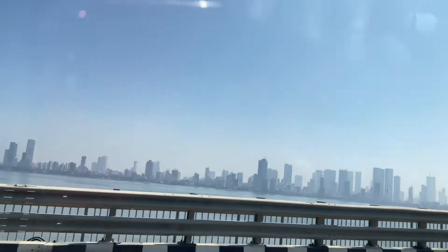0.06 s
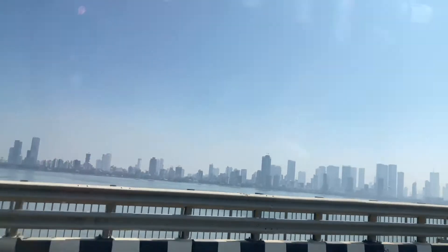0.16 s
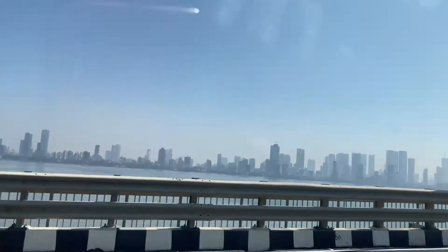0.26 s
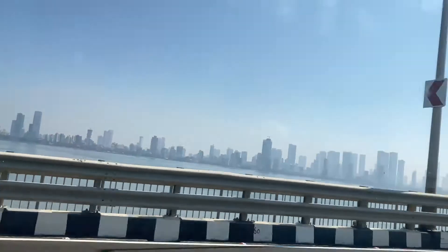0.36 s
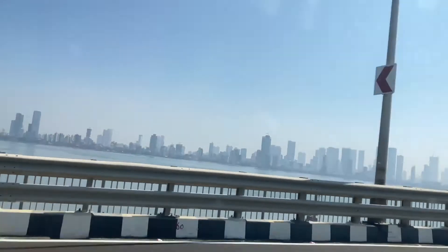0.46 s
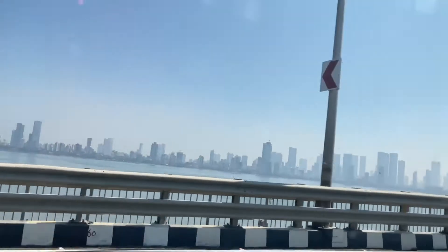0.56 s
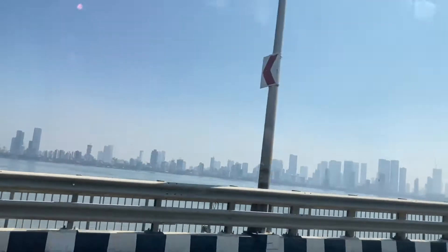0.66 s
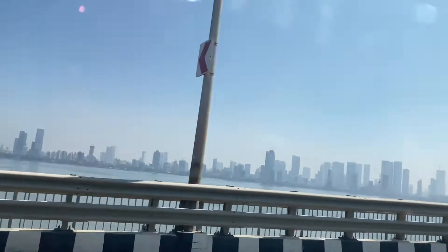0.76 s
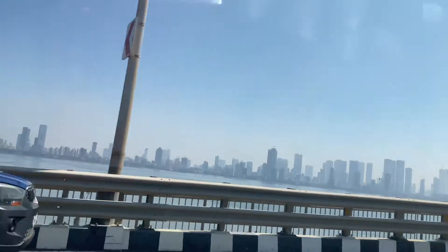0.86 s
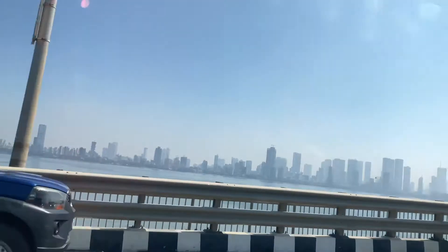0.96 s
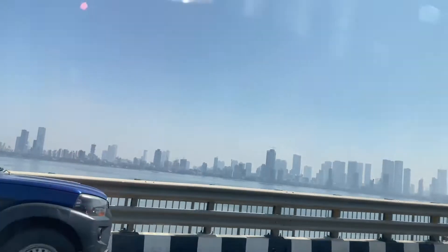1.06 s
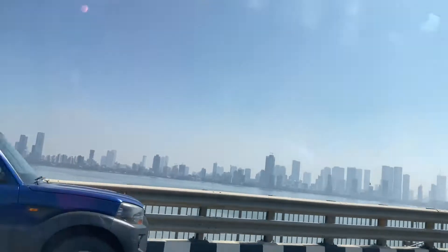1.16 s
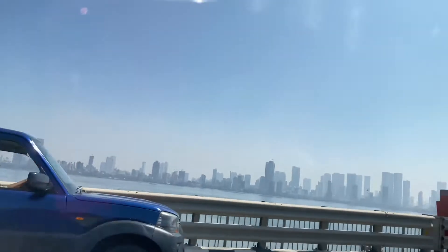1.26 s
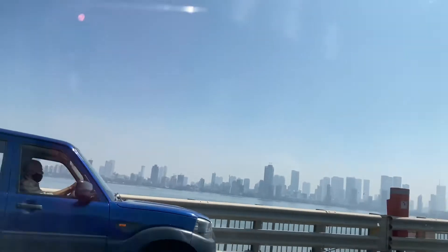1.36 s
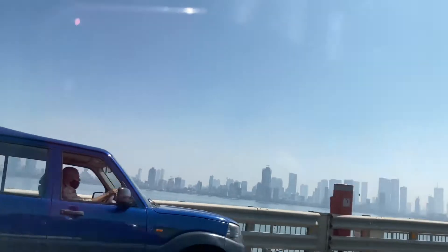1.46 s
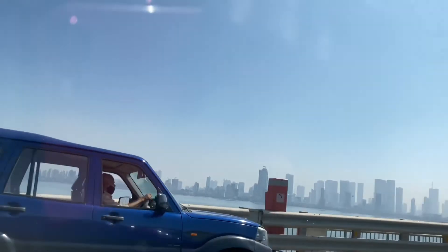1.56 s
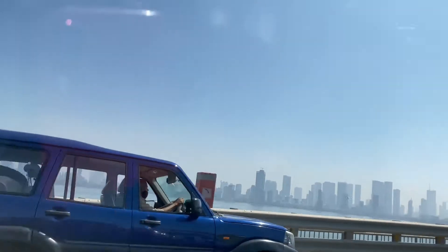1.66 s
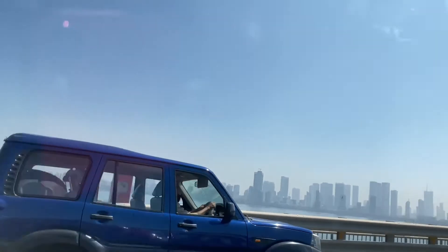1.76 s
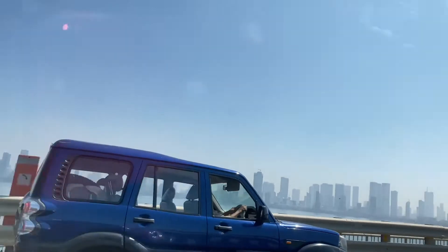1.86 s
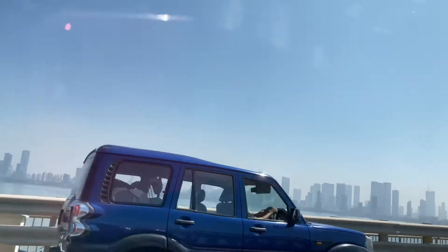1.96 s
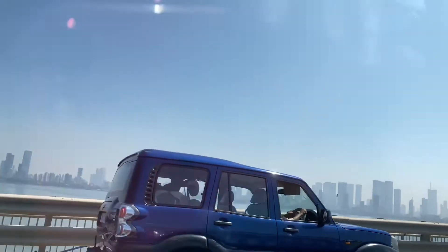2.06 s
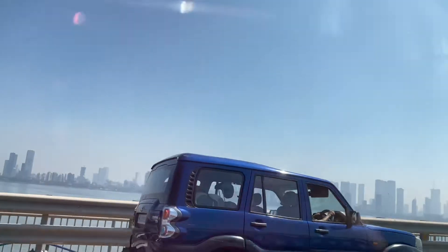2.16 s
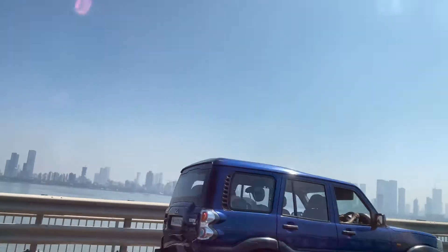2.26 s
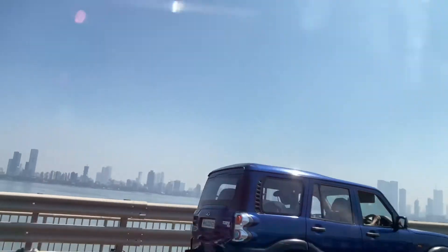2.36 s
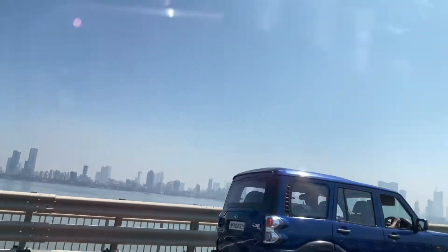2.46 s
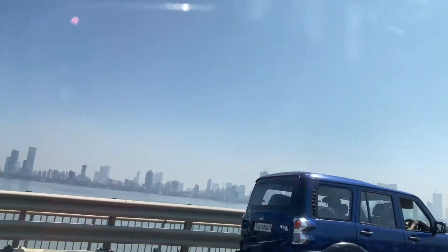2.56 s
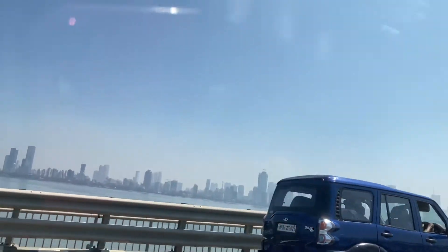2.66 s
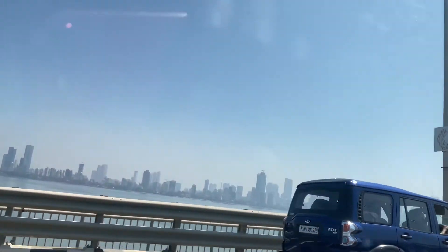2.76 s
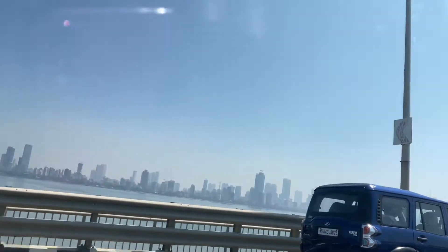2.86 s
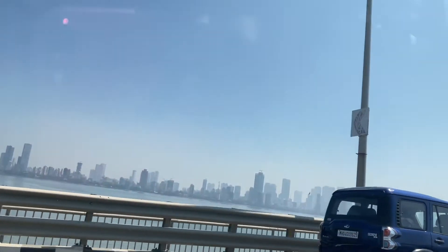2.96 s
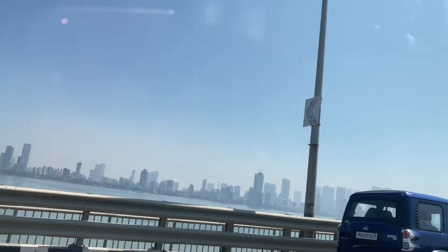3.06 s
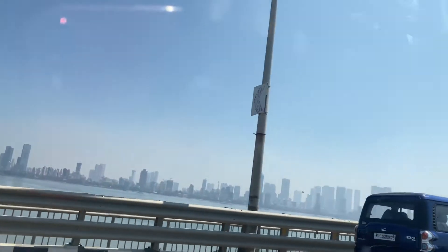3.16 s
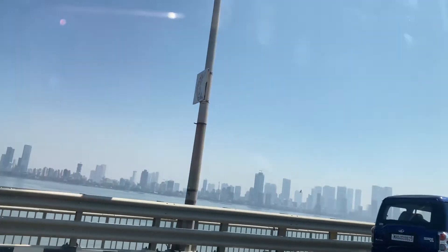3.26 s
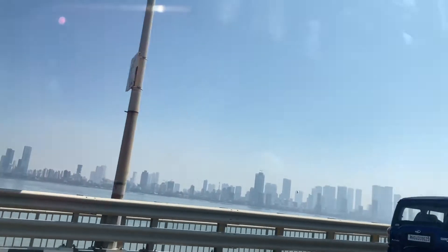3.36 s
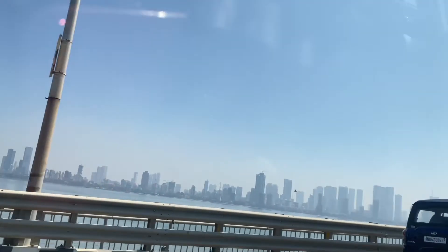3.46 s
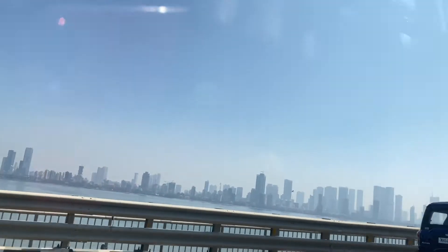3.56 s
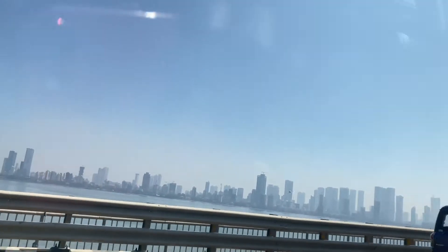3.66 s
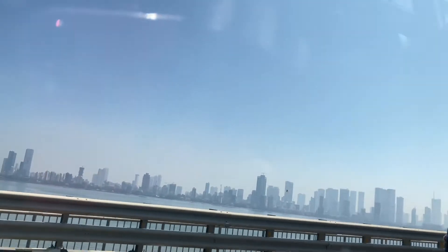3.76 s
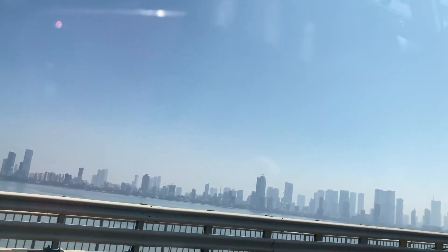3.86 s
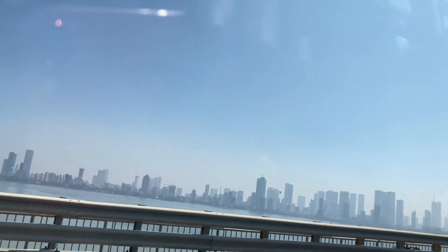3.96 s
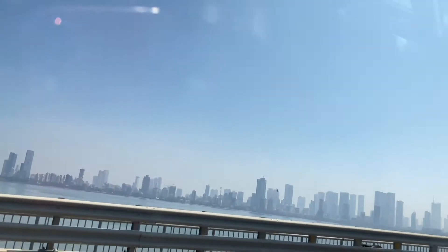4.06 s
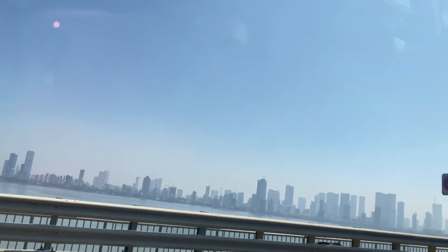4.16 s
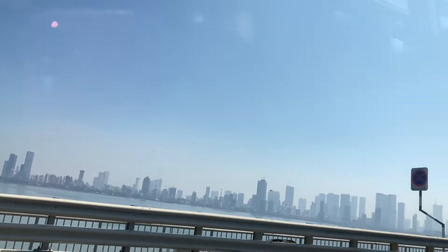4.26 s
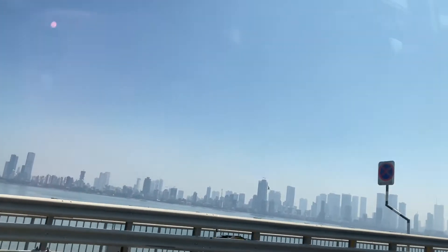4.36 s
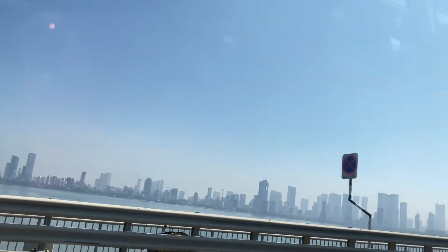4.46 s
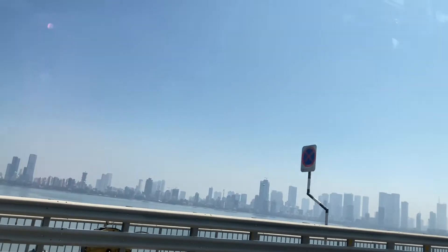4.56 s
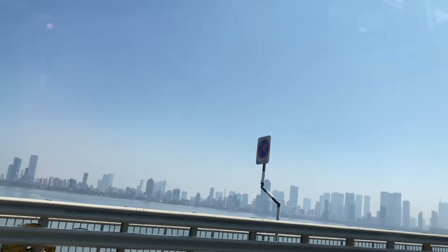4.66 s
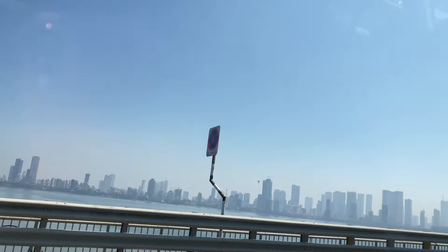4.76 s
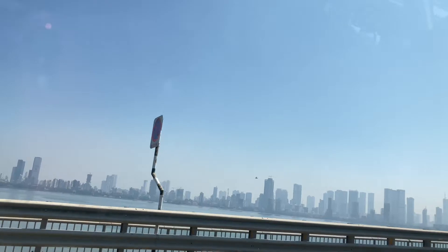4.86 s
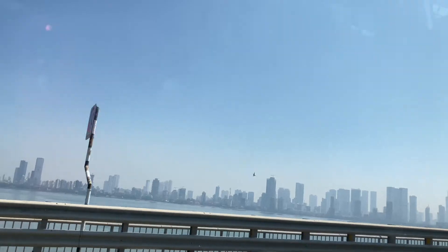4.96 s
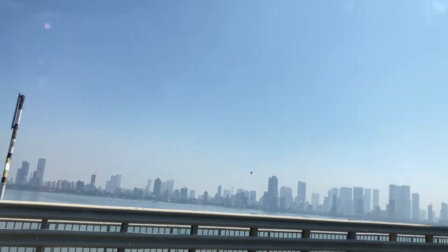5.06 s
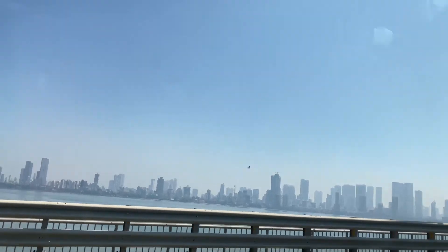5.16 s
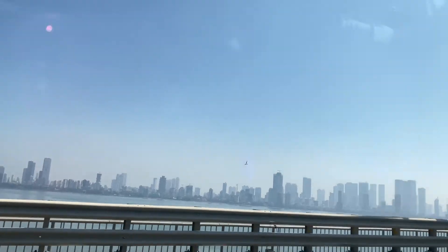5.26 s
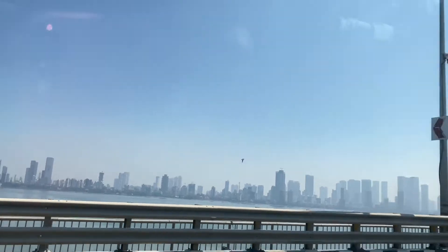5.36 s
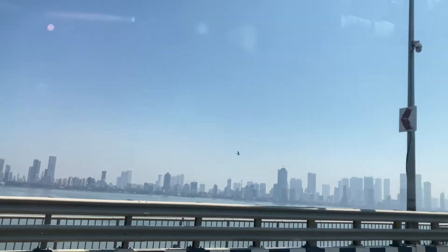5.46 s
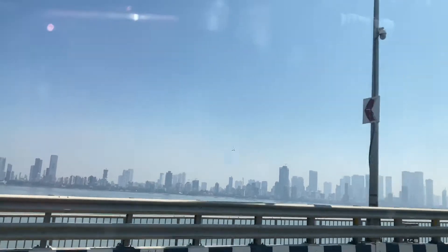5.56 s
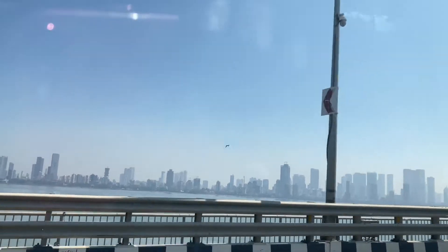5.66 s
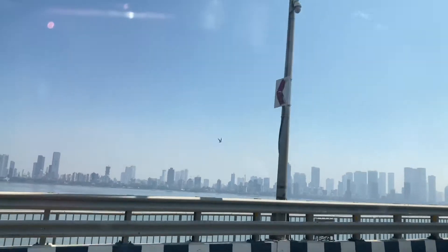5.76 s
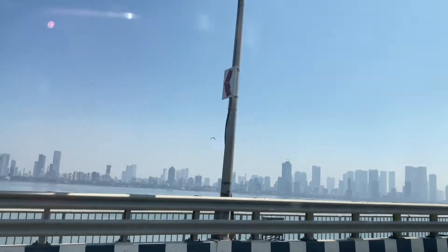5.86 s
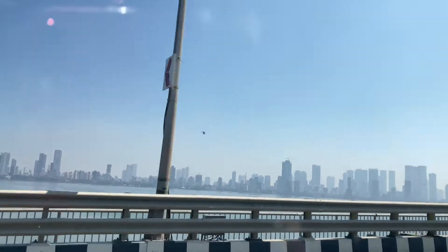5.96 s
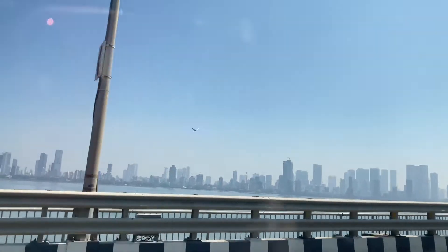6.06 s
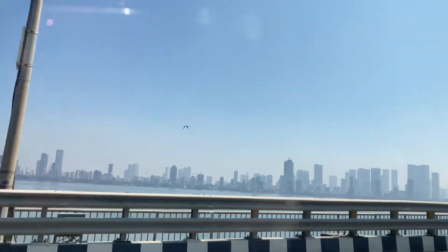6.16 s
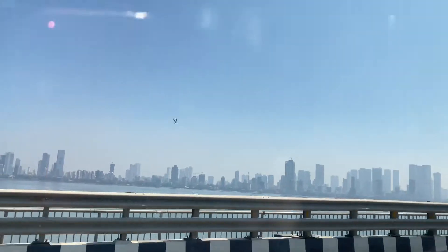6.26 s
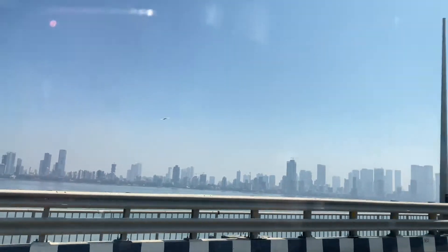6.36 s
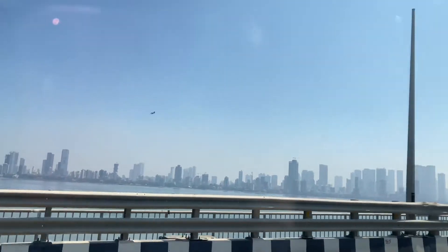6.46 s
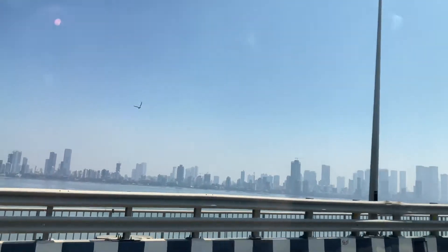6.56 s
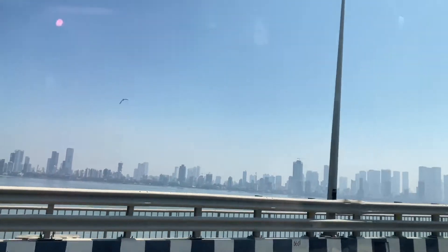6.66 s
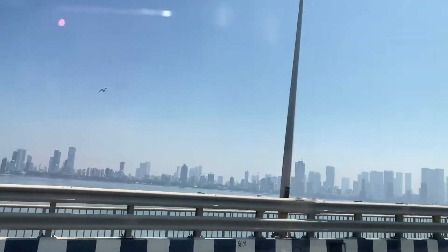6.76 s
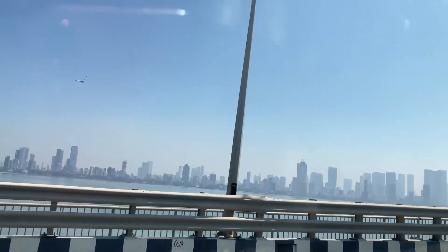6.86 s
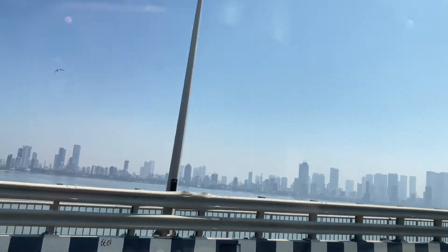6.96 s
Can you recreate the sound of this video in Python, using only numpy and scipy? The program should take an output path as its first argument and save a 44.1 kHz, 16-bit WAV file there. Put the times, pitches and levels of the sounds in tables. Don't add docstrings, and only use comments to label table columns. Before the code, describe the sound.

The listener sits inside a closed car crossing a bridge, with the microphone close in the cabin. From 0 to about 2.5 seconds the tyres hit ribbed strips in a quick regular run, about one every 0.19 seconds. Each is a deep, thick thump with a brief ribbed growl, shaking doors and floor, dull knocks and slaps, and a dry clatter of loose plastic. Rattle and sharp little clacks are strongest from about 0.6 to 2.2 seconds. Low engine hum and heavy road boom swell underneath. Around 2.5 seconds the last strip fades and the level falls sharply. Until 7 seconds there is smooth asphalt: a muffled, wavering low hum, soft tyre roar, faint hollow tyre resonance and barely audible air hiss. Soft floor bumps continue irregularly, slightly fuller around 5 to 5.8 seconds, with tiny ticks near 3.7 and 3.8. The drone continues to the end.

```python
import sys
import numpy as np
from scipy import signal
from scipy.fft import rfft, irfft, next_fast_len
from scipy.io import wavfile

SR = 44100
rng = np.random.default_rng(int(sys.argv[2]) if len(sys.argv) > 2 else 0)


def attenuation_scalar(level_db):
    decades = np.asarray(level_db, float) / 20
    return 10 ** decades


def persist_wave(psi):
    counts = np.round(np.clip(psi, -1, 1) * 32767).astype(np.int16)
    wavfile.write(sys.argv[1], SR, np.atleast_2d(counts).T)


N = 309582
PADDED = next_fast_len(N + 2048)
TIME_S = np.arange(N) / SR

# (time [s], thump level [dB], panel level [dB], rattle level [dB], rattle half width [s])
STRIPS = [(0.065, -11.5, -33, -58, .02), (0.252, -15.5, -32.5, -41, 0.015),
          (0.458, -15.5, -22.5, -43.5, 0.026), (0.631, -13.5, -22.5, -37.5, 0.024),
          (0.823, -13.5, -19, -38.5, 0.034), (1.004, -13, -17, -35, 0.036), (1.193, -12, -19, -37.5, 0.043),
          (1.379, -8.5, -21, -35, 0.038), (1.56, -8, -23.5, -38, 0.032), (1.746, -10, -23.5, -34.5, 0.035),
          (1.937, -11, -21, -36.5, 0.038), (2.124, -10, -19.5, -37.5, 0.047),
          (2.313, -15.5, -35, -44.5, 0.046), (2.49, -23, -28, -48.5, 0.13)]


def strips():
    ribs_per_s, jitter = 85, 0.11
    turns = np.cumsum(ribs_per_s * (1 + jitter * drift(30)) / SR)
    ribs = np.flatnonzero(np.diff(np.floor(turns)))
    chop = 1 + 0.13 * np.cos(2 * np.pi * turns)
    return thumps(ribs) + panels(chop) + rattle(chop)


def thumps(ribs):
    # (pitch [Hz], level [dB], time to fall 60 dB [s])
    body_modes = [(53, -6, 0.13), (93.6, -9, 0.043), (108, -3.5, 0.08), (125.1, 1.5, 0.23),
                  (149, -18, 0.078), (213, -19, 0.025)]
    rib_spread_db, ribs_db, half_s = 4, -6.5, 0.058
    s, thump_db = np.transpose(STRIPS)[:2]
    push = swell(s - .012, thump_db + ribs_db, half_s)
    paths = []
    for path in range(2):
        kicks = 0.018 * rng.standard_normal((len(body_modes), N))
        kicks[:, ribs] = attenuation_scalar(rib_spread_db * kicks[:, ribs] / np.std(kicks))
        modes = list(zip(kicks, body_modes))
        steady = np.std(sum(attenuation_scalar(db) * ring(k[:SR], hz, t60) for k, (hz, db, t60) in modes))
        ringing = sum(attenuation_scalar(db) * ring(k * push, hz, t60) for k, (hz, db, t60) in modes)
        paths.append(ringing / steady)
    return heard(ports(*paths))


def panels(chop):
    # (pitch [Hz], level [dB per Hz])
    panel_colour = [(88, -37.5), (150, -3.5), (209, 0), (295, -4), (388, -5), (494, -12.5), (1100, -27.5),
                    (1430, -74), (2420, -120)]
    s, panel_db = np.transpose(STRIPS)[[0, 2]]
    shake = swell(s, panel_db - 1.5, half_s=0.047)
    return shake * chop * coloured(panel_colour, patchy_db=4.5, patch_rate=29)


def rattle(chop):
    # (pitch [Hz], level [dB per Hz])
    trim_colour = [(600, -20), (900, -1), (1300, -5), (1600, -9), (2000, -11), (2500, -14.5), (5000, -25),
                   (8000, -32), (11000, -30), (15500, -36), (16000, -50)]
    # (time [s], level [dB])
    stray_jolts = [
        (.03, -60),
        (.118, -50),
        (.14, -45),
        (.3, -54),
        (1.3, -46),
        (2.04, -47),
    ]
    rebound_s, rebound_db, rebound_half_s = .043, -7, .011
    bed_db, jolt_half_s, snap_cut_hz = -2, .018, 3200
    s, rattle_db, rattle_s = np.transpose(STRIPS)[[0, 3, 4]]
    streaks = attenuation_scalar(2.2 * drift(160))
    struck = swell(s - .005, rattle_db, rattle_s)
    rebound = swell(s + rebound_s, rattle_db + rebound_db, rebound_half_s)
    shaken = attenuation_scalar(bed_db) * np.hypot(struck, rebound)
    shaken = np.hypot(shaken, swell(*np.transpose(stray_jolts), jolt_half_s))
    clatter = coloured(trim_colour, patchy_db=1.5, patch_rate=31)
    dull = signal.lfilter(*signal.butter(2, snap_cut_hz, fs=SR), clatter[:, ::-1])
    return chop * streaks * (shaken * clatter + snaps() * dull)


def snaps():
    # (time [s], level [dB])
    snap_events = [(0.2108, -44), (0.2318, -36.5), (0.2532, -41), (0.2821, -43), (0.2938, -40.5),
                   (0.4323, -39.5), (0.48, -43), (0.578, -48), (0.5914, -47), (0.6054, -42), (0.6184, -35),
                   (0.7331, -46), (0.7616, -46), (0.774, -45), (0.8109, -34), (0.8478, -33.5),
                   (0.9521, -41), (0.9967, -33), (1.1427, -49), (1.1472, -46), (1.1881, -36), (1.3223, -45),
                   (1.3462, -43), (1.3676, -37), (1.5084, -46), (1.5193, -43), (1.5587, -36), (1.6009, -37),
                   (1.6585, -49), (1.6924, -45), (1.731, -40), (1.871, -45), (1.906, -38), (1.9259, -31),
                   (1.9663, -34), (2.0681, -45), (2.096, -35), (2.1065, -36), (2.336, -41)]
    rise_s, fall_s = .0015, 0.018
    s, db = np.transpose(snap_events)
    power = np.full(N, 1e-18)
    power[(s * SR).astype(int)] = attenuation_scalar(2 * (db - 1))
    rise, fall = np.exp(-2 / (SR * np.array([rise_s, fall_s])))
    softened = signal.lfilter([1 - rise], [1, -rise], power)
    return np.sqrt(signal.lfilter([1], [1, -fall], softened))


def blows():
    # (time [s], peak level [dB])
    heaves = [(0.149, -10), (0.261, -19.5), (0.346, -17), (0.427, -15), (0.522, -19.5), (0.609, -10.5),
              (0.815, -22), (0.901, -15), (0.991, -10.5), (1.081, -11.5), (1.189, -9.5), (1.362, -16),
              (1.453, -14.5), (1.593, -21), (1.728, -9.5), (1.92, -10), (2.005, -16), (2.106, -10.5),
              (2.19, -13), (2.288, -17), (2.377, -14), (2.486, -19.5), (2.566, -18.5), (2.655, -29),
              (2.884, -33), (3.002, -22), (3.106, -18), (3.344, -18.5), (3.737, -18.5), (3.941, -26.5),
              (3.999, -28.5), (4.093, -30), (4.181, -31), (4.312, -20.5), (4.467, -25), (4.588, -22),
              (4.657, -32.5), (4.747, -32), (4.818, -22), (4.937, -20.5), (5.068, -16.5), (5.204, -15.5),
              (5.395, -16), (5.62, -15), (5.798, -15), (5.891, -25), (5.985, -26), (6.141, -33.5),
              (6.215, -25), (6.511, -22.5), (6.621, -18)]
    # (time [s], peak level [dB])
    drops = [(0.064, -6.5), (0.117, -8), (0.236, -4), (0.28, -13), (0.43, -3), (0.481, -14.5),
             (0.536, -15.5), (0.604, -6.5), (0.718, -17.5), (0.772, -19), (0.8, -7.5), (0.869, -9.5),
             (0.959, -10.5), (1.017, -3.5), (1.156, -5.5), (1.243, -9.5), (1.363, -12.5), (1.395, -5.5),
             (1.527, -11.5), (1.58, -4), (1.696, -12.5), (1.756, -16), (1.784, -8), (1.939, -6),
             (1.986, -12.5), (2.093, -7.5), (2.139, -8), (2.184, -12.5), (2.287, -5.5), (2.342, -13),
             (2.393, -13), (2.478, -8)]
    # (time [s], peak level [dB])
    knocks = [(0.327, -18.5), (0.427, -18), (0.612, -12), (0.685, -11.5), (0.784, -12.5), (0.918, -15.5),
              (1.016, -14.5), (1.045, -13.5), (1.169, -14.5), (1.222, -12), (1.387, -14.5), (1.541, -7),
              (1.715, -9), (1.755, -10.5), (1.785, -13), (1.907, -7.5), (2.091, -13.5), (2.132, -16),
              (2.186, -21), (2.259, -21), (2.295, -21), (2.378, -19), (2.461, -21.5)]
    # (time [s], peak level [dB])
    slaps = [(0.252, -22), (0.296, -24.5), (0.46, -17), (0.628, -15.5), (0.83, -21), (0.965, -13.5),
             (1.001, -13), (1.207, -13), (1.336, -13.5), (1.379, -14), (1.571, -13.5), (1.69, -16),
             (1.721, -18.5), (1.762, -17), (1.834, -15.5), (1.886, -18.5), (1.95, -17.5), (2.126, -18.5)]
    # (time [s], peak level [dB])
    taps = [(0.248, -30), (0.271, -28), (0.295, -21.5), (0.411, -30), (0.451, -29), (0.488, -28),
            (0.559, -36), (0.669, -20), (0.703, -30), (0.764, -25), (0.809, -27.5), (0.951, -26),
            (0.989, -25), (1.037, -25), (1.071, -34), (1.125, -34), (1.144, -24), (1.286, -26),
            (1.522, -27), (1.555, -26), (1.606, -24.5), (1.683, -27), (1.72, -20.5), (1.78, -27),
            (1.813, -26), (1.838, -36), (1.866, -36), (1.89, -31), (2.247, -31), (2.268, -29), (2.33, -29),
            (2.399, -35), (2.434, -33), (2.475, -35), (2.552, -30)]
    # (pitch [Hz], pitch waver [share], half length [s], trim level [dB])
    struck_parts = [
        (49.2, 0.062, .03, -3),
        (97, .04, 0.016, -2),
        (152.8, .05, .015, -2.5),
        (268, 0.089, .011, -5),
        (610, .14, .005, -3),
    ]
    late_taps = np.add(taps, (.005, 0))
    out = np.zeros((2, N))
    for events, (hz, waver, half_s, trim_db) in zip((heaves, drops, knocks, slaps, late_taps), struck_parts):
        s, db = np.transpose(events)
        phase = 2 * np.pi * np.cumsum(hz * (1 + waver * drift(12))) / SR
        out += swell(s, db + trim_db, half_s) * np.array([np.sin(phase), np.cos(phase)])
    return out


def buzz():
    # (pitch [Hz], level [dB per Hz])
    buzz_colour = [(1600, -12), (2300, 2), (3000, 0), (5000, -5), (8000, -9), (11000, -8), (15500, -15),
                   (16000, -30)]
    fade_start_s, fade_db_per_s = 2.25, 22
    level_db = -59.5 - fade_db_per_s * np.maximum(TIME_S - fade_start_s, 0)
    return attenuation_scalar(level_db) * coloured(buzz_colour, patchy_db=1.5, patch_rate=15)


def engine():
    # (time [s], pitch [Hz], level [dB])
    firing = [(0, 64.15, -23.5), (.3, 67.12, -18.5), (.7, 67.87, -13.5), (1.15, 65.65, -14),
              (1.6, 66.91, -13.5), (2.2, 66.51, -12.5), (2.45, 70.36, -24.5), (2.9, 71.46, -19),
              (3.6, 69.94, -25), (4.1, 69.45, -25), (4.8, 70.05, -21.5), (5.4, 69.04, -23),
              (6.1, 68.62, -19.5), (7.02, 66.04, -28.5)]
    # (time [s], change of hum [dB], half width [s])
    mount_loads = [(2.728, -27, .07), (2.9, 0, 0.063), (2.985, -16.5, .025), (3.1, 1, 0.072),
                   (3.9, 1, 0.054), (4.07, 8.5, 0.034), (4.58, -7, 0.079), (4.71, 5.5, 0.035),
                   (5.168, 4.5, 0.066), (5.25, -5.5, 0.055), (5.37, 5.5, .03), (5.449, -5, 0.039),
                   (6.033, -13.5, .035), (6.11, 0.5, 0.054), (6.271, -10.5, 0.053), (6.401, 1, 0.037)]
    lead_s, unload_db, unload_half_s = 0.066, -9.5, 0.028
    hz, level_db = in_time(firing)
    unloaded = bells(np.transpose(STRIPS)[0] - lead_s, unload_db, unload_half_s)
    level_db = level_db + bells(*np.transpose(mount_loads)) + unloaded
    phase = 2 * np.pi * np.cumsum(hz * (1 + .012 * drift(7.56))) / SR
    hum = np.sqrt(2) * attenuation_scalar(level_db + 1.9 * drift(24)) * np.sin(phase)
    other_hum = np.sqrt(2) * attenuation_scalar(level_db) * np.sin(phase + 1.5 * drift(1.8))
    return np.array([hum, other_hum])


def cavity():
    # (time [s], level [dB], half width [s])
    coarse_patches = [
        (0, -24, 0.24),
        (.9, -31, 0.41),
        (1.95, -29.5, 0.32),
        (2.75, -33, 0.4),
        (3.66, -37, 0.078),
        (4.45, -30.5, 0.22),
        (5.352, -35.5, 0.16),
        (6.999, -35.5, .15),
    ]
    hz, width_hz, rest_db = 246, 8, -43.5
    t60 = np.log(1000) / (np.pi * width_hz)
    tones = []
    for grain in rng.standard_normal((2, N)):
        tones.append(rms_one(ring(ring(grain, hz, t60), hz, t60)))
    level = np.hypot(attenuation_scalar(rest_db), swell(*np.transpose(coarse_patches)))
    return attenuation_scalar(-1.5) * level * np.array(tones)


def trim():
    # (time [s], peak level [dB], pitch [Hz], band width [share of pitch], half length [s])
    ticks = [(.056, -22, 660, .4, .017), (3.67, -45, 1450, .25, .003), (3.797, -51, 2020, .2, .003),
             (.025, -50, 6500, 1.1, .002), (.139, -54, 6500, 1.1, .0015), (.138, -40, 1150, .3, .005),
             (.215, -42, 1150, .3, .003), (.234, -47, 4500, .9, .0015), (.247, -52, 4700, .5, .003),
             (.255, -46, 1600, .12, .008), (2.285, -54, 4500, .6, .0015), (2.34, -45, 2000, .5, .005),
             (2.453, -44, 1180, .2, .004), (2.485, -58, 4500, .5, .0015), (2.61, -45, 1100, .25, .003),
             (.295, -48, 2100, .3, .004), (.428, -55, 4200, .8, .0015), (.58, -57, 6500, .7, .001),
             (.607, -50, 4600, .5, .003), (.631, -52, 6000, .8, .002), (.767, -54, 3200, .6, .0015),
             (.795, -52, 4300, .4, .003), (1.742, -52, 7000, .4, .004), (1.912, -53, 4800, .5, .002)]
    # (time [s], peak level [dB], pitch [Hz])
    clacks = [(.437, -50, 2660), (.488, -45.5, 2210), (0.624, -44, 2030), (.816, -47, 1950),
              (.855, -43, 2070), (1.003, -43, 2100), (1.385, -39.5, 1940), (1.608, -46, 2150),
              (1.748, -39, 1650), (1.935, -44, 2060), (1.971, -47, 1900), (2.115, -43, 1890),
              (2.149, -45, 2000)]
    clack_share, clack_half_s = .25, 0.0054
    puffs = list(ticks) + [(*clack, clack_share, clack_half_s) for clack in clacks]
    out, t = np.zeros((2, N)), np.arange(-2400, 2400)
    for s, db, hz, share, half_s in puffs:
        edges = hz * (1 + share / 2) ** np.array([-1, 1])
        band = signal.butter(4, edges, "band", fs=SR, output="sos")
        puff = rms_one(signal.sosfilt(band, rng.standard_normal((2, len(t)))))
        puff = attenuation_scalar(db) * np.exp(-.5 * (t / SR / half_s) ** 2) * puff
        at = round(s * SR) + t
        inside = (at >= 0) & (at < N)
        out[:, at[inside]] += puff[:, inside]
    return out


def road():
    # (time [s], level [dB])
    shaking = [(0, 14), (.2, 8), (.5, 8), (1.3, 10.5), (2.15, 9.5), (2.5, 0.5), (2.74, -2), (2.9, -0.5),
               (3.6, -2), (4.5, 0.5), (5.2, 0), (5.7, 0), (6.3, -3), (7.02, 0.5)]
    # (pitch [Hz], level [dB per Hz])
    boom_colour = [(16, -21), (25, -13.5), (32, -8), (40, -6.5), (50, -2.5), (58, -3.5), (66, -28.5)]
    # (pitch [Hz], level [dB per Hz])
    roar_colour = [(60, -25), (82, -4), (98, -12), (118, -10), (165, -16), (240, -21), (390, -22),
                   (460, -29), (640, -29.5), (800, -41), (1200, -46), (1600, -51), (2000, -56), (2400, -64),
                   (3200, -80)]
    # (pitch [Hz], level [dB per Hz])
    air_colour = [(1500, -20), (1900, -8), (2300, 2), (3000, -1), (3800, -1), (5600, -8), (7000, -16),
                  (9500, -22), (11000, -18), (13000, -27), (15000, -45)]
    hush_lead_s, hush_db, hush_half_s = 0.083, -5, .035
    shake_db, = in_time(shaking)
    boom = attenuation_scalar(-30.5 + 1.24 * shake_db) * coloured(boom_colour, patchy_db=-4.0, patch_rate=3.2)
    opening_db = 4 * np.exp(-TIME_S / 0.041)
    hushed_db = bells(np.transpose(STRIPS)[0] - hush_lead_s, hush_db, hush_half_s)
    roar_db = hushed_db - 25.5 + 0.57 * shake_db + opening_db
    roar = attenuation_scalar(roar_db) * coloured(roar_colour, patchy_db=1.5, patch_rate=28)
    air = attenuation_scalar(-70) * coloured(air_colour, patchy_db=1.2, patch_rate=8)
    return boom + roar + air


def ports(left, other):
    # (pitch [Hz], likeness [0-1], right lead [rad], left minus right [dB])
    port_pair = [(20, .96, 0, -2), (90, .95, -.1, -1.4), (125, .89, -.15, .6), (300, .6, .1, 1.8),
                 (550, .3, 1, 2), (900, .42, 2.7, .5), (2000, .2, 2.2, -.8), (3000, .2, 4, 0),
                 (4300, .3, 5.9, .4), (5600, .15, 5.5, 0), (7000, .55, 6.3, 0), (9000, .9, 9.4, 0),
                 (16000, .9, 18.9, 0)]
    hz = np.fft.rfftfreq(PADDED, 1 / SR)
    points, *columns = np.transpose(port_pair)
    alike, lead, pan_db = [np.interp(hz, points, c) for c in columns]
    left, other = rfft(run_out(left)), rfft(run_out(other))
    right = (alike * left + np.sqrt(1 - alike ** 2) * other) * np.exp(1j * lead)
    return np.array([left * attenuation_scalar(pan_db / 2), right * attenuation_scalar(-pan_db / 2)])


def heard(spectra):
    return irfft(spectra, PADDED)[:, :N]


def run_out(x):
    spare = PADDED - len(x)
    out = np.pad(x, (0, spare), "reflect", reflect_type="odd")
    out[len(x):] *= np.cos(np.linspace(0, np.pi / 2, spare)) ** 2
    return out


def coloured(spectrum, patchy_db, patch_rate):
    hz = np.maximum(np.fft.rfftfreq(PADDED, 1 / SR), 1)
    points_hz, points_db = np.transpose(spectrum)
    shape = attenuation_scalar(np.interp(np.log(hz), np.log(points_hz), points_db, left=-200, right=-200))
    noise = ports(*rng.standard_normal((2, PADDED))) * shape
    band = 1.1 * np.log2(hz / points_hz[0])
    band_count = int(1.1 * np.log2(points_hz[-1] / points_hz[0])) + 2
    out, together = 0, coarse_drift(patch_rate / 4)
    for k in range(band_count):
        overlap = np.clip(1 - abs(band - k), 0, 1)
        flicker = attenuation_scalar(patchy_db * (0.44 * together + coarse_drift(patch_rate)))
        out = out + heard(noise * overlap) * filled(flicker)
    return rms_one(out)


def ring(clicks, hz, t60):
    r, w = attenuation_scalar(-60 / (t60 * SR)), 2 * np.pi * hz / SR
    return signal.lfilter([0, np.sin(w)], [1, -2 * r * np.cos(w), r * r], clicks + 1e-18)


def swell(times, levels_db, half_s):
    return np.sqrt(bells(times, attenuation_scalar(2 * levels_db), half_s) + 1e-30)


def bells(times, heights, half_s):
    coarse = np.arange(0, N + 32, 32)
    times, heights, half_s = [np.reshape(v, (-1, 1)) for v in (times, heights, half_s)]
    shapes = np.exp(-((coarse / SR - times) / half_s) ** 2)
    return np.interp(np.arange(N), coarse, np.sum(heights * shapes, axis=0))


def in_time(rows):
    s, *columns = np.transpose(rows)
    return [np.interp(TIME_S, s, c) for c in columns]


def drift(rate):
    return filled(coarse_drift(rate))


def coarse_drift(rate):
    r = np.exp(-80 * np.pi * rate / SR)
    chance = rng.standard_normal(N // 40 + 2002)
    return rms_one(signal.lfilter([1], [1, -2 * r, r * r], chance)[2000:])


def filled(coarse):
    return np.interp(np.arange(N) / 40, np.arange(len(coarse)), coarse)


def rms_one(x):
    return x / np.sqrt(np.mean(x ** 2) + 1e-20)


def scene():
    through_ports = blows() + engine() + cavity() + trim()
    return strips() + buzz() + heard(ports(*through_ports)) + road()


def top_cut(x):
    return signal.sosfilt(signal.butter(12, 17110, fs=SR, output="sos"), x)


def record(dry):
    dry = signal.sosfilt(signal.butter(2, 22, "high", fs=SR, output="sos"), dry)
    limited = dry / (1 + (dry / .95) ** 6) ** (1 / 6)
    return top_cut(limited)


dry = scene()
out = record(dry)
persist_wave(out)
```